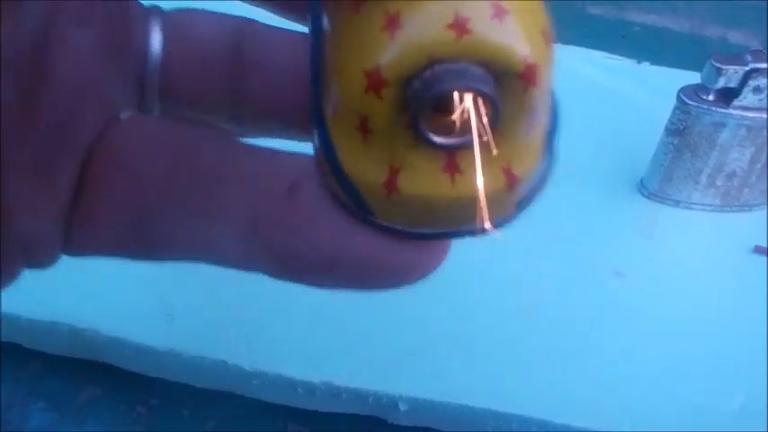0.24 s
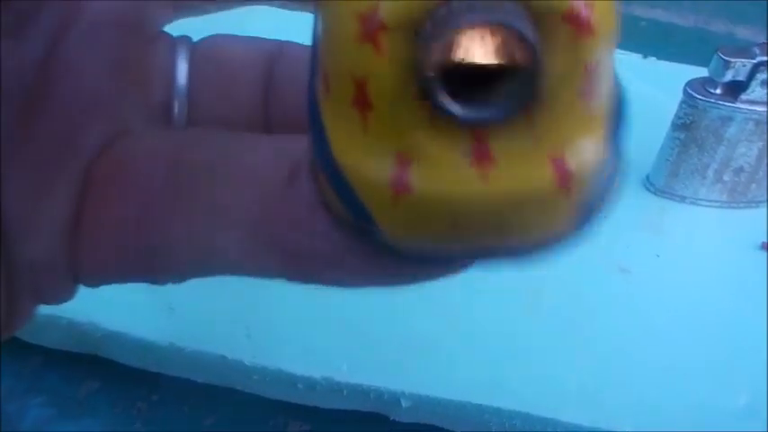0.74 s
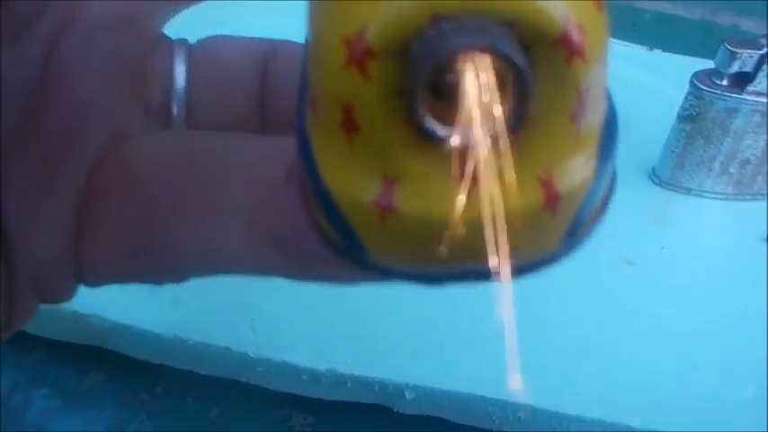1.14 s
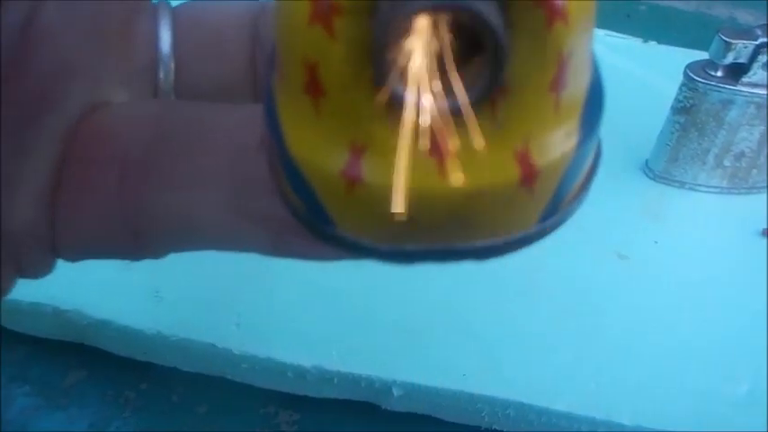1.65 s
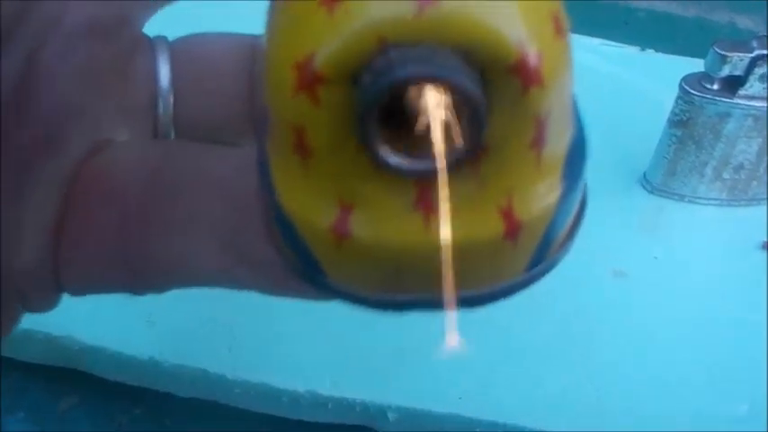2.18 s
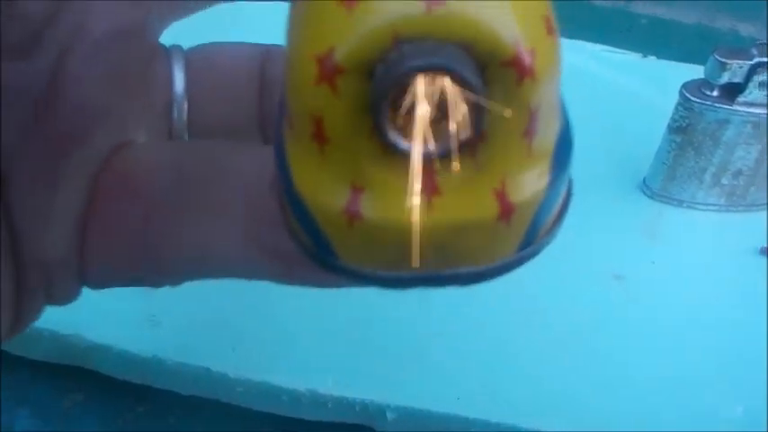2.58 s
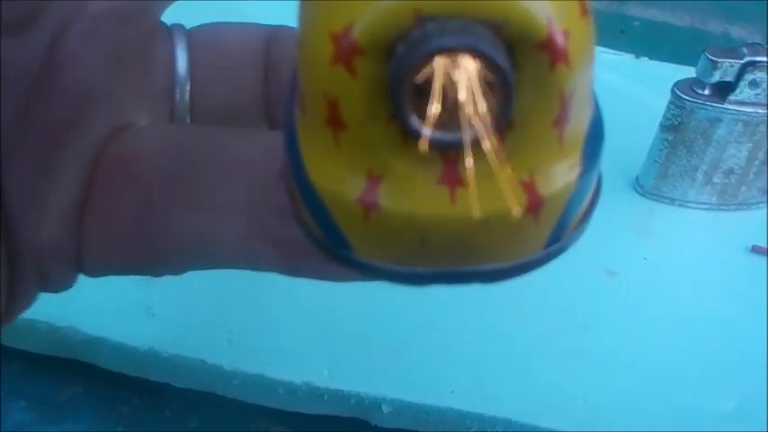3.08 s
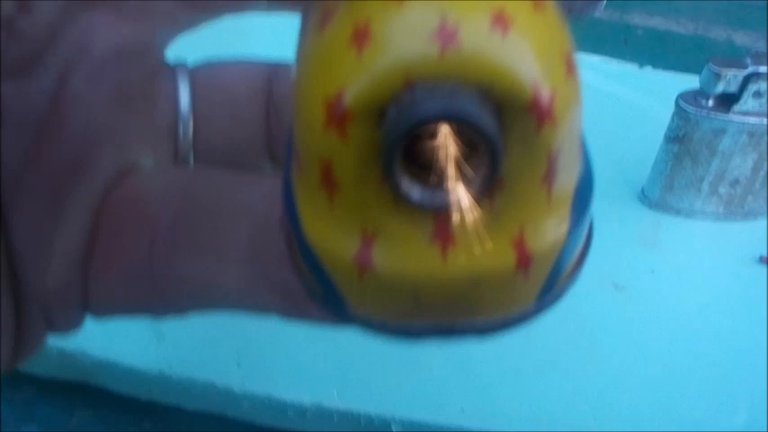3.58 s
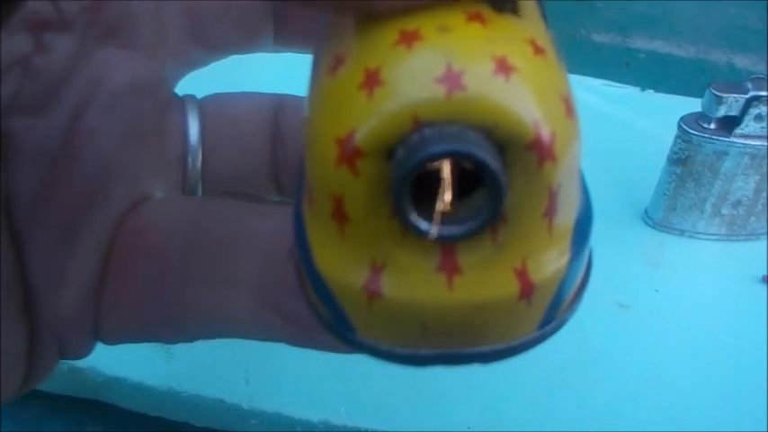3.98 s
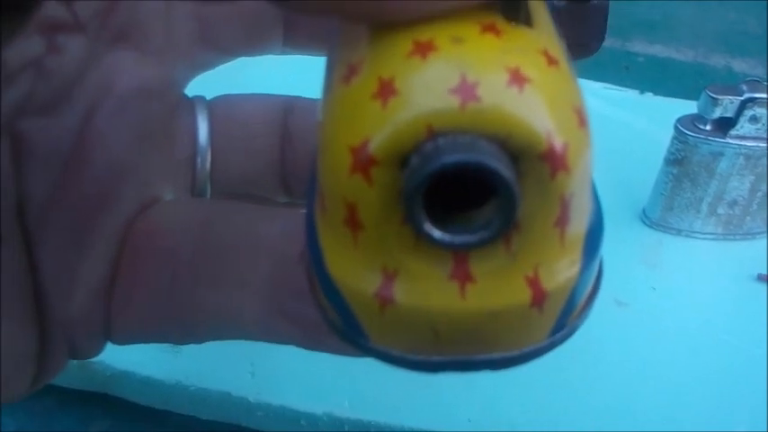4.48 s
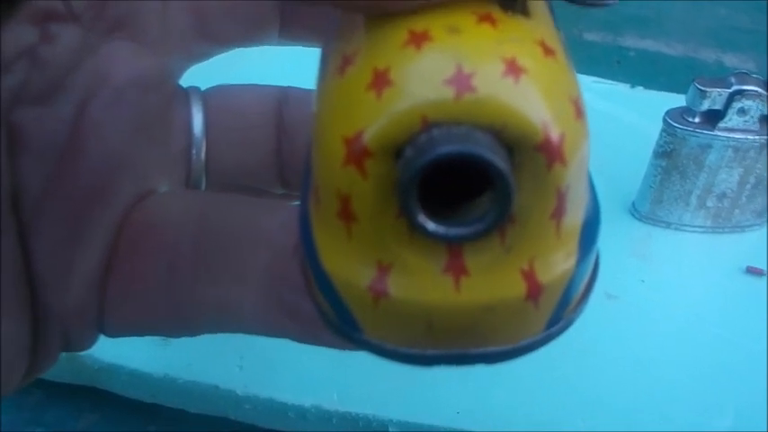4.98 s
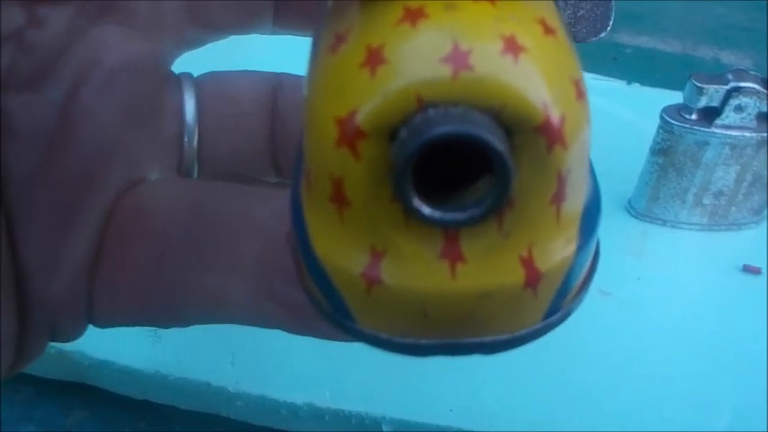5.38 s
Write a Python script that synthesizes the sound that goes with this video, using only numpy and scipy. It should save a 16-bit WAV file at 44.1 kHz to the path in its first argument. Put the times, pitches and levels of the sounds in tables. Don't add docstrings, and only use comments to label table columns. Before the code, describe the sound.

A small wind-up tin toy grinds its wheel on flint with a loud, harsh, bright metallic whir, slowing and fading as creaky clicks appear.

```python
import sys
import numpy as np
from scipy import signal
from scipy.fft import rfft, irfft
from scipy.io import wavfile
from scipy.ndimage import uniform_filter1d, minimum_filter1d, map_coordinates

SR = 44100
rng = np.random.default_rng(int(sys.argv[2]) if len(sys.argv) > 2 else 0)


def inscribe(sig):
    pcm = np.round(np.clip(np.atleast_2d(sig).T, -1, 1) * 32767)
    wavfile.write(sys.argv[1], SR, pcm.astype(np.int16))


def how_loud(loudness_db):
    steps = np.asarray(loudness_db, float) / 20
    return 10 ** steps


N = 248724
T = np.arange(N) / SR

# start_s, plate_db, hollow_re_plate_db
GRIND = [(0, -30.5, -17.5), (.11, -23.5, -14.5), (.18, -25, -11.5), (.3, -22.5, -7), (.57, -14.5, -13.5),
         (.8, -17, -10.5), (1.1, -17, -13), (1.5, -18, -13), (2, -17.5, -17), (2.35, -18, -16),
         (2.65, -18.5, -13), (3.05, -18.5, -18), (3.6, -18, -17), (4, -18.5, -14), (4.75, -20.5, -18),
         (4.9, -23, -17.5), (5.2, -25.5, -12.5), (5.64, -27.5, -15)]
# freq_hz, density_db_per_hz
PLATE = [(1530, -93), (2600, -56), (3050, -43.5), (3300, -27), (3550, -19), (4230, -6.5), (4550, -0.5),
         (4790, 1.5), (4950, -2), (5270, -8.5), (5700, -6), (6100, -11.5), (7930, -41.5), (13400, -120)]
# freq_hz, density_db_per_hz
UPPER = [(3590, -41.5), (6100, -1.5), (6630, 6.5), (6940, 4), (7270, -5.5), (8200, -32.5), (10700, -75.5),
         (18000, -120)]
# freq_hz, density_db_per_hz
HOLLOW = [(680, -66), (1150, -32.5), (1250, -20.5), (1550, 0), (1870, 2.5), (2000, -5.5), (2310, -43.5),
          (2440, -77), (2500, -56), (3250, -53), (5500, -120)]
# freq_hz, density_db_per_hz
WALL = [(2900, -39.5), (3250, -36), (3550, 16), (3850, -26.5), (4400, -30.5)]
# freq_hz, density_db_per_hz
RUMBLE = [(59, -75), (100, -49), (741, -9), (1070, 1.5), (1150, 1), (1500, -4), (2530, -120)]
# freq_hz, density_db_per_hz
SIZZLE = [(4820, -29), (8200, -5), (8490, -2), (8870, -3.5), (9330, -8.5), (10100, -7), (11200, -13.5),
          (13800, -2.5), (15600, -11.5)]
# freq_hz, level_re_common_db
DIFFUSE = [(100, -4), (700, -5), (1300, -20), (2400, -13), (4400, -12.5), (8000, -7.5), (15000, -3)]


def grind(duck_db):
    port_lead_s, pan_db = 1.2e-5, -1.1
    plate_db = pressure()
    hollow_db = np.interp(T, *np.transpose(GRIND)[[0, 2]])
    spinup = bell(0.54, 0.39)
    upper_db = -8.5 - 7 * spinup
    sizzle_follows = 0.8
    sizzle_db = 1.5 - 2 * spinup + (sizzle_follows - 1) * (plate_db + 15.5)
    wall_db = -16 - 25 * (1 - bell(0.35, 0.25))
    pressure_db = 0.4 * walk(45) + 1.1 * walk(150) + 1.5 * walk(400) + duck_db

    grains, loose = grit(14000, 1.7), grit(14000, 0.89)
    streams = np.array([grains, late(grains, port_lead_s), loose])
    layers = (  # resonance, level_db, own_wobble_db
        (PLATE, -0.8, 0.067 * walk(35)),
        (UPPER, upper_db, 0.66 * walk(40)),
        (HOLLOW, 0.77 + hollow_db, 0.8 * walk(30) + 1.8 * walk(120)),
        (WALL, wall_db, 3.8 * walk(23)),
        (RUMBLE, -37, 2.0 * walk(21.7)),
        (SIZZLE, -35 + sizzle_db, 1.8 * walk(15)))
    shell = np.zeros((3, N))
    for points, level_db, wobble_db in layers:
        ringing = colour(streams * how_loud(pressure_db + wobble_db), points)
        left_rms = np.sqrt(np.mean(ringing[0] ** 2))
        shell += ringing / left_rms * how_loud(level_db)
    left, right, apart = shell * how_loud(plate_db)
    apart = colour(apart, DIFFUSE)
    return np.array([left + apart, right - apart]) * how_loud(np.array([[pan_db], [-pan_db]]) / 2)


# time_s,
# depth_db
SNAGS = [(1.752, 6), (1.908, 3), (2.39, 3), (2.47, 3.5), (2.78, 10.5), (3.202, 16), (3.918, 6), (4.41, 0),
         (4.85, 4), (5.0, 2), (5.222, 16.5), (5.439, 12), (5.554, 14), (5.63, 4)]


def pressure():
    lurch_hz, peak_s, lurch_db, span_s = 5.56, 0.78, 1.5, 0.3
    lurch = lurch_db * bell(peak_s, span_s) * np.cos(2 * np.pi * lurch_hz * (T - peak_s))
    snag_s = 0.012
    snags = np.zeros(N)
    for time_s, depth_db in SNAGS:
        press = 0.67 * bell(time_s - 0.5 * snag_s, snag_s)
        snags += depth_db * (press - bell(time_s, snag_s))
    return np.interp(T, *np.transpose(GRIND)[:2]) + lurch + snags


def grit(rate_hz, spread_db):
    hit = rng.random(N) < rate_hz / SR
    hardness_db = np.minimum(spread_db * rng.exponential(size=N), 18)
    return unit(hit * rng.standard_normal(N) * how_loud(hardness_db))


def bites(rows):
    time_s, tick_db, thump_db, pan_db = np.transpose(rows)
    sign = np.sign(rng.standard_normal(len(time_s)))
    ring, ring_lead_s = burst(4800, 0.0007)
    tick, tick_lead_s = burst(13700, 0.0001)
    thump, thump_lead_s = burst(850, 0.00058)
    common = strike(time_s - ring_lead_s, sign * how_loud(-8 + 0.4 * (tick_db + 24)), ring)
    out = []
    for side in (1, -1):
        port = sign * how_loud(np.minimum(side * pan_db, 0) + 2.0)
        ticks = strike(time_s - tick_lead_s, port * how_loud(tick_db), tick)
        thumps = strike(time_s - thump_lead_s, port * how_loud(tick_db + thump_db + 7.5), thump)
        out.append(common + ticks + thumps)
    return np.array(out)


# time_s, tick_peak_db, thump_re_tick_db
BITES = [(.4962, -31, -23), (.5354, -30.5, -22.5), (.6667, -29, -22), (.8338, -24, -14.5),
         (1.0276, -32.5, -13), (1.0974, -32, -14), (1.2107, -24.5, -19), (1.2306, -32, -15.5),
         (1.2745, -32, -11), (1.3343, -31, -19.5), (1.3826, -28.5, -14), (1.5513, -27.5, -18),
         (1.927, -26.5, -18), (1.9779, -31, -11.5), (2.0302, -27, -24), (2.2744, -33, -11),
         (2.4673, -26.5, -19.5), (2.691, -32.5, -12), (2.7064, -26, -18.5), (2.7747, -26, -18.5),
         (2.9528, -28.5, -28), (3.1872, -26.5, -26.5), (3.2434, -30, -16), (3.3395, -25.5, -23.5),
         (3.4781, -27, -18.5), (3.5178, -31, -21.5), (3.9002, -24.5, -23.5), (4.0825, -24, -17),
         (4.2158, -29.5, -14), (4.3371, -33.5, -23.5)]


def all_bites():
    count, from_s, to_s = 30, 0.55, 4.3
    luck = rng.random((count, 3)).T
    faint = [from_s + (to_s - from_s) * luck[0],
             -34 + 3 * (luck[1] - 0.5),
             -23 + 10 * (luck[2] - 0.5)]
    rows = np.vstack([BITES, np.transpose(faint)])
    pan_db = -3 + 6 * rng.standard_normal((len(rows), 1))
    return np.column_stack([rows, pan_db])


# freq_hz, gain_db
CASE_NEAR = [(100, -29), (250, -28.5), (400, -18), (1000, -3), (1400, 2), (2000, 3.5), (2250, -15.5),
             (2600, -27), (4000, -37.5)]
# freq_hz, gain_db
CASE_FAR = [(100, -61), (250, -22), (600, -7), (1000, -14), (1300, 13), (1750, 12.5), (2100, 6),
            (2600, -39), (4000, -43.5)]
# freq_hz, level_re_snap_db, t60_s
RING_NEAR = [(1000, -22, .02), (1350, -19, .02), (1950, -14, .022)]
# freq_hz, level_re_snap_db, t60_s
RING_FAR = [(1250, -16, .022), (1480, -15, .022), (1780, -10, .028)]


def creaks(slips):
    far_delay_s, size = 0.000078, 2048
    out = np.zeros((2, N + size))
    for time_s, right_db, left_db, _ in slips:
        tune = 1 + 0.058 * rng.standard_normal(3)
        mix_db = 3 * rng.standard_normal(3)
        gain = np.sign(rng.standard_normal()) * how_loud(right_db)
        near = int((time_s - 0.0005) * SR)
        far = int((time_s - 0.0005 + far_delay_s) * SR)
        out[0, far:far + size] += gain * how_loud(left_db) * snap(CASE_FAR, RING_FAR, tune, mix_db)
        out[1, near:near + size] += gain * how_loud(3.0) * snap(CASE_NEAR, RING_NEAR, tune, mix_db)
    tick, lead_s = burst(10600, 0.00009)
    ticks = strike(slips[:, 0] - lead_s, how_loud(slips[:, 1] + slips[:, 3]), tick)
    return out[:, :N] + ticks * how_loud(np.array([[-18], [0]]))


def snap(points, rings, tune, mix_db):
    t = np.arange(2048) / SR
    pulse = colour(1. * (t == 0), points, size=4096)[:len(t)]
    tail = np.zeros(len(t))
    for (freq_hz, level_db, t60_s), detune, extra_db in zip(rings, tune, mix_db):
        decay = np.exp(-np.log(1000) * t / t60_s)
        tail += how_loud(level_db + extra_db) * np.sin(2 * np.pi * freq_hz * detune * t) * decay
    return pulse / np.abs(pulse).max() + tail * (1 - np.exp(-(t / 0.00064) ** 2))


# time_s, right_peak_db
SLIPS = [(5.1464, -23), (5.1566, -15), (5.1601, -8.5), (5.1634, -8), (5.1687, -8.5), (5.1747, -16),
         (5.2002, -22), (5.2082, -7.5), (5.2198, -18), (5.281, -8), (5.2916, -10.5), (5.302, -9),
         (5.3126, -10), (5.3496, -11), (5.3605, -9.5), (5.3709, -14), (5.444, -29), (5.452, -33),
         (5.467, -31), (5.481, -30), (5.513, -25), (5.5176, -23), (5.5367, -8), (5.5767, -24), (5.5825, -9),
         (5.5927, -7.5), (5.6022, -8), (5.6148, -15.5)]


def all_slips():
    rebound_s, rebound_db = 0.0027, -7.5
    first = np.array(SLIPS)
    free = np.diff(first[:, 0], append=np.inf) > 1.5 * rebound_s
    slips = np.vstack([first, first[free] + (rebound_s, rebound_db)])
    tick_db = np.interp(slips[:, 1], (-15, -9), (-37, -21.5))
    return np.column_stack([slips, np.full(len(slips), -4.5), tick_db])


def ducking(bite_rows, slip_rows):
    t = np.arange(12000) / SR
    bite, slip = bite_rows.T, slip_rows.T
    quick = strike(bite[0] + 0.0012, np.clip(0.25 * (bite[1] + 36), 0, 9), np.exp(-t / 0.014))
    slow = strike(slip[0] + 0.0005, np.clip(0.9 * (slip[1] + 16), 0, 8), np.exp(-t / 0.032))
    return -quick - 9 * np.tanh(slow / 9)


def jolts(bite, slip):
    pulse, lead_s = burst(111, 0.0036)
    time_s = np.concatenate([bite[:, 0], slip[:, 0]])
    level_db = np.concatenate([bite[:, 1] + bite[:, 2], slip[:, 1] - 28]) - 15
    return strike(time_s - lead_s, how_loud(level_db), pulse)


# time_s, pitch_hz, level_db
WHINE = [
    (3.85, 1036, -56),
    (3.87, 1041, -61),
    (3.946, 1118, -56),
    (3.97, 1068, -61),
    (4.062, 1082, -53.5),
    (4.138, 1096, -60),
    (4.35, 1108, -65),
]


def whine():
    time_s, pitch_hz, level_db = np.transpose(WHINE)
    waver = 1 + 0.0058 * walk(60)
    phase = 2 * np.pi * np.cumsum(np.interp(T, time_s, pitch_hz) * waver) / SR
    fade = np.clip(np.minimum(T - time_s[0], time_s[-1] - T) / 0.046, 0, 1)
    return np.sqrt(2) * np.sin(phase) * fade * how_loud(np.interp(T, time_s, level_db))


def colour(x, points, size=2 ** 18):
    freq_hz, gain_db = np.transpose(points)
    log_f = np.log(np.fft.rfftfreq(size, 1 / SR) + 1)
    log_gain = np.interp(log_f, np.log(freq_hz), np.maximum(gain_db, -90)) * np.log(10) / 20
    cep = irfft(log_gain)
    cep[1:size // 2] *= 2
    cep[size // 2 + 1:] = 0
    return irfft(rfft(x, size) * np.exp(rfft(cep)))[..., :N]


def strike(times_s, gains, shape):
    train = np.zeros(N)
    np.add.at(train, (np.asarray(times_s) * SR).astype(int), gains)
    return signal.fftconvolve(train, shape / np.abs(signal.hilbert(shape)).max())[:N]


def burst(freq_hz, width_s):
    t = np.arange(-3 * width_s, 3 * width_s, 1 / SR)
    return np.cos(2 * np.pi * freq_hz * t) * np.exp(-(t / width_s) ** 2), 3 * width_s


def walk(rate_hz):
    hold = int(SR / rate_hz)
    steps = np.repeat(rng.standard_normal(N // hold + 1), hold)
    return unit(uniform_filter1d(uniform_filter1d(steps, hold), hold)[:N])


def unit(x):
    return x / np.sqrt(np.mean(x ** 2))


def late(x, delay_s):
    return map_coordinates(x, [(T - delay_s) * SR], mode="nearest")


def bell(centre_s, span_s):
    return np.exp(-((T - centre_s) / span_s) ** 2)


def scene():
    bite, slip = all_bites(), all_slips()
    toy = grind(ducking(bite, slip)) + bites(bite)
    return toy + creaks(slip) + jolts(bite, slip) + whine()


def roll_off(x):
    return signal.sosfilt(signal.butter(12, 15770, fs=SR, output="sos"), x)


# freq_hz, gain_db
MIC = [(40, -61), (110, -21), (250, -4.5), (2200, -0.5), (2350, -2), (2480, -46), (2620, 8.5), (3100, -0.5),
       (7600, 0), (8150, -14), (8500, 2.5)]


def record(dry):
    span, top_db = int(0.003 * SR), -5
    need = np.minimum(how_loud(top_db) / (np.abs(dry).max(axis=0) + 1e-9), 1)
    gain = uniform_filter1d(minimum_filter1d(need, span), span)
    mix = colour(dry * gain, MIC)
    return roll_off(mix)


dry = scene()
out = record(dry)
inscribe(out)
```